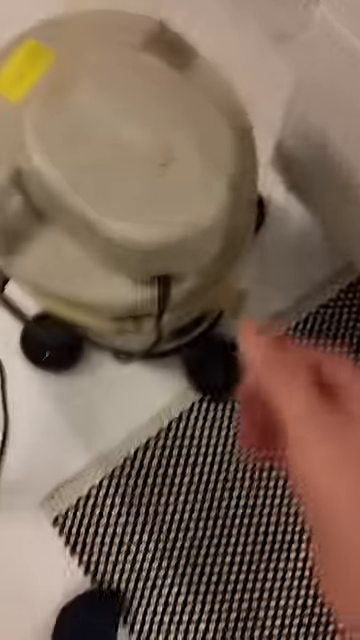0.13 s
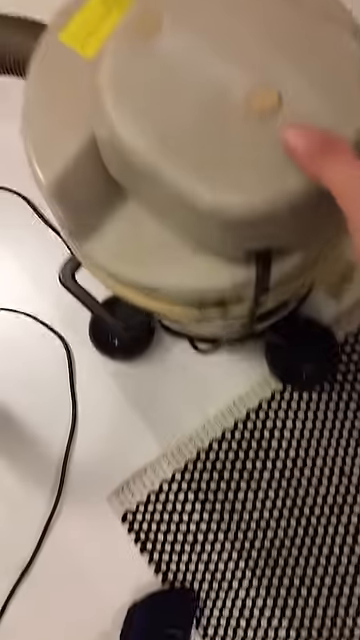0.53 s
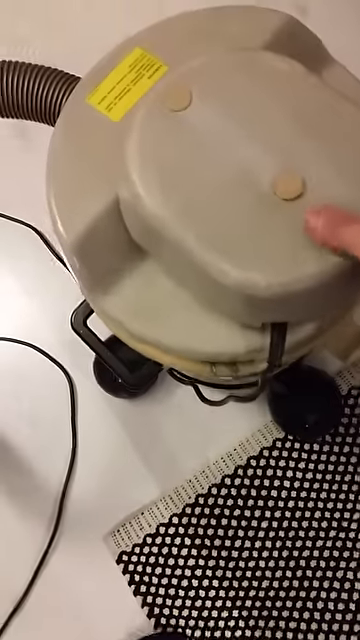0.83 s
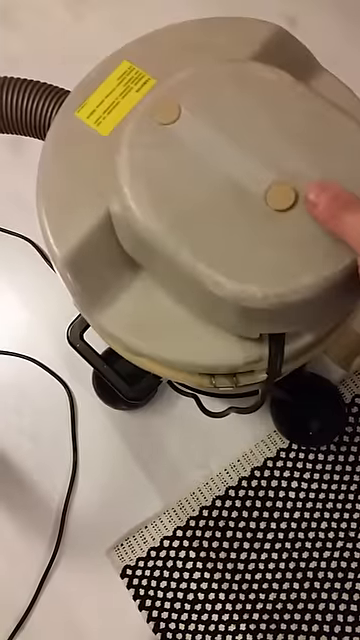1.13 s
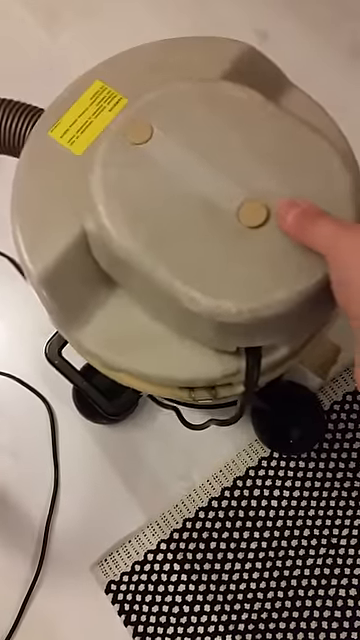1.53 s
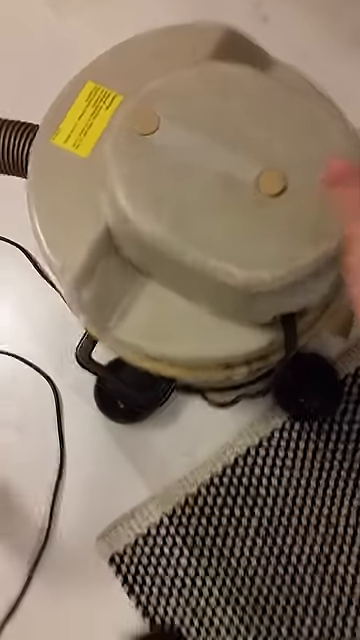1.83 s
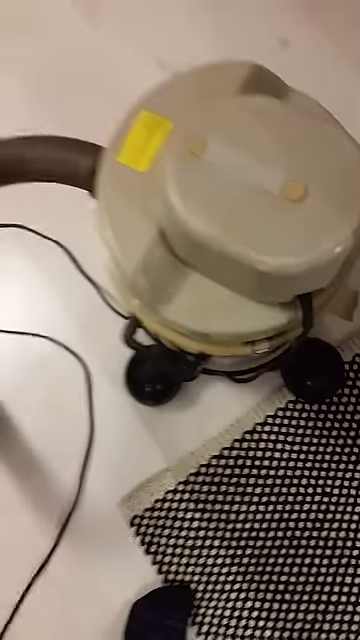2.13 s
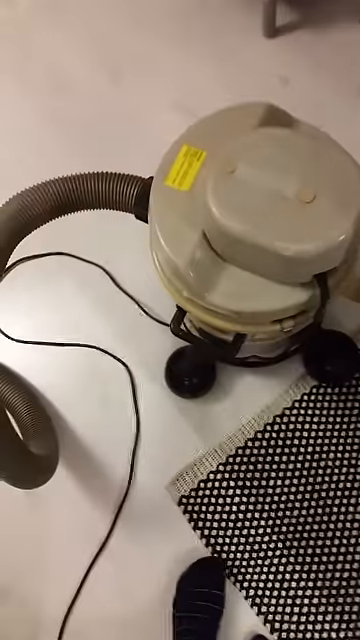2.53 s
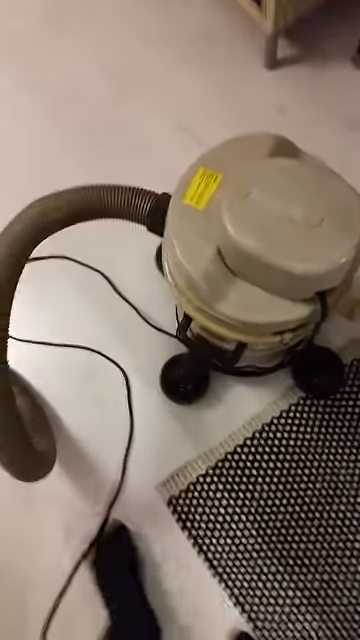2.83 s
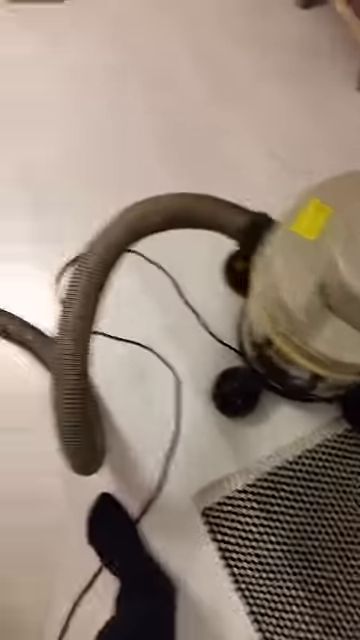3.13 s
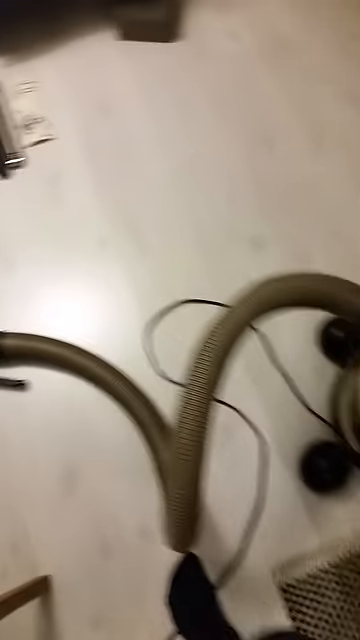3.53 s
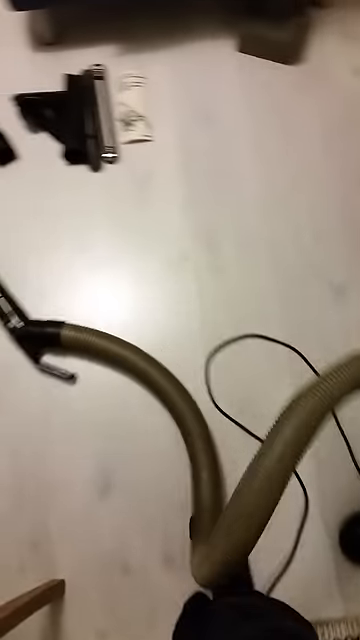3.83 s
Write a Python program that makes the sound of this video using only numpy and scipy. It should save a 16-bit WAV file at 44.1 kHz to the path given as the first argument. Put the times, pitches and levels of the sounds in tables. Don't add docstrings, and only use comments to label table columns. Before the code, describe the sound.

A canister vacuum cleaner is switched on: quiet room with rustle and small knocks, a hard plastic snap, a hum and rapidly rising whine, then a steady airy roar, picked up close by a handheld phone.

```python
import sys
import numpy as np
from scipy import signal
from scipy.fft import rfft, irfft
from scipy.io import wavfile
from scipy.ndimage import uniform_filter1d

SR = 44100
rng = np.random.default_rng(int(sys.argv[2]) if len(sys.argv) > 2 else 0)


def generate_wav(signal):
    frames = np.transpose(np.atleast_2d(signal))
    scaled = np.clip(frames, -1, 1) * 32767
    pcm = np.round(scaled).astype(np.int16)
    wavfile.write(sys.argv[1], SR, pcm)


def magnitude_from_level(level_db):
    exponent = np.asarray(level_db, float) / 20
    return 10 ** exponent


N = 176400
TIME_S = np.arange(N) / SR

# (frequency [Hz], level [dB])
ROOM_LEFT = [(20, -93), (45, -76.5), (130, -94), (600, -93.5), (1800, -104), (2700, -124), (7500, -134),
             (15500, -120)]
ROOM_RIGHT = [(20, -75.5), (90, -71), (150, -77.5), (260, -92), (1800, -109), (2800, -121), (8000, -134),
              (15500, -122)]
# (time [s], level [dB], pitch [Hz], t60 [s], left-right [dB])
KNOCKS = [
    (.125, -51, 150, .06, -8),
    (.19, -51, 140, .06, -8),
    (.368, -58, 450, .05, 4),
    (.479, -57, 300, .05, -4),
    (.811, -62, 540, .04, 6),
    (.845, -62, 1000, .06, 3),
    (.846, -58, 565, .07, 3),
    (.902, -55, 406, .09, 4),
    (.932, -61, 900, .05, 4),
    (1.482, -37, 95, .06, -8),
]
# (delay [s], level [dB], extra level of bright modes [dB])
BOUNCES = [
    (-.0008, -11, -33),
    (.0006, -3, -1),
    (.0014, -14, 1),
    (.002, -6.5, 9.5),
    (.0032, 2, -6),
    (.0052, -8, -3),
    (.0072, -14, 0),
    (.041, -6, -20),
    (.044, -11, -20),
]
# (frequency [Hz], level [dB], t60 [s])
LID_MODES = [(695, 1.5, 0.021), (1270, -8, 0.011), (1680, -2.5, 0.017), (1990, -12, 0.025),
             (4670, -10, 0.008), (7500, -27, 0.005), (11600, -5, .004), (13700, 1, .004), (15300, -8, .004),
             (16600, -14, .003)]
# (multiple of hum [1], level [dB])
HUM_OVERTONES = [(2, -19), (3, -23.5), (4, -14), (5, -15.5)]
# (time [s], air rush [dB], shaft tone [dB], shaft left-right [dB],
# sixth-order whine [dB], dulling share [1])
PHONE_PATH = [(1.7, -21.5, -59, 2, -58, -3), (1.79, -22.5, -25.5, 1.5, -51, -1.1),
              (1.85, -18, -22, 1.5, -46, -1.5), (1.89, -19.5, -28.5, 2, -36, -0.8),
              (1.95, -19, -40.5, 17, -37, -0.7), (2.03, -20.5, -38, 9, -42.5, -0.9),
              (2.08, -19, -24.5, -5, -27, -1.5), (2.251, -20.5, -24.5, -6.5, -42, -0.85),
              (2.45, -20.5, -15.5, -3, -46, -1.2), (2.57, -20, -32, -14.5, -41, -1.3),
              (2.7, -20, -22.5, 0.5, -58, -0.94), (2.9, -20, -19.5, -2.5, -43, -1.35),
              (3.18, -20, -16.5, -2, -29, -2.0), (3.36, -21.5, -14.5, -0.5, -43, -1.7),
              (3.48, -20.5, -13.5, -1.5, -28.5, -2.5), (3.7, -19.5, -14.5, -4.5, -35, -3),
              (3.9, -19, -16, -4, -30, -3.5), (4.0, -19.5, -17.5, -5.5, -30.5, -3.5)]
AIR_COL, SHAFT_COL, PAN_COL, WHINE_COL, DULL_COL = range(1, 6)
# (time [s], lag [s])
RIGHT_LAG = [
    (1.7, .00006),
    (2.0, .0002),
    (2.6, .00019),
    (3.1, .00013),
    (3.5, .00005),
    (3.8, -.00001),
]
# (multiple of shaft rate [1], level [dB], extra level at standstill [dB])
SHAFT_ORDERS = [(3, -42, -25), (4, -45, -12), (5, -45, -8), (24, -55, -25), (26, -55, -25)]
# (time [s], frequency [Hz], width [Hz], level [dB], span [s])
SQUEALS = [
    (2.095, 10230, 150, -29, .032),
    (2.165, 10760, 200, -30, .022),
    (2.23, 10230, 200, -35, .07),
    (1.95, 9000, 300, -37, .03),
]
# (frequency [Hz], level [dB per Hz])
AIR = [(40, -13), (110, -13), (170, -1), (400, 0), (1400, -1.5), (3000, -6), (6000, -7.5), (16000, -22)]
# (frequency [Hz], power of speed [1])
AIR_GROWTH = [(100, 0.34), (800, 1.35), (3000, 3.45), (5200, 2.4), (7000, 3.7), (10000, 2.35), (15000, 1.5)]
# (frequency [Hz], width [Hz], boost [dB])
DRUM_MODES = [(381.5, 28, 6.5), (674, 110, -6.5), (863, 34, 4), (1430, 140, -4), (2000, 790, 6),
              (2830, 48, 6.5), (3220, 690, -2.5), (3860, 35, 3), (5340, 67, 0), (10500, 100, 1),
              (9200, 720, 2), (10150, 500, 1.5)]
# (frequency [Hz], width [Hz], boost [dB])
FLOOR_BOUNCE = [(820, 190, 4), (1680, 1150, -3.5), (380, 190, 4)]
# (left [dB], right [dB])
TURN_DB = (4.5, 1)
# (frequency [Hz], correlation [1])
AIR_LIKENESS = [(60, .7), (130, .95), (290, .85), (640, .65), (950, .65), (1410, .36), (3100, .22),
                (5500, .12)]
# (time [s], level [dB], length [s])
BOOMS = [
    (1.96, -37, 0.061),
    (2.117, -35.5, 0.15),
    (2.286, -40, 0.037),
    (2.6, -27.5, 0.051),
    (2.793, -28, 0.046),
    (3.034, -25, 0.037),
    (3.17, -29, 0.034),
    (3.371, -29, 0.058),
    (3.643, -29.5, 0.056),
    (3.847, -32.5, 0.057),
]
# (frequency [Hz], gain [dB])
MIC_LEFT = [(45, -2.5), (700, 3), (2400, 2.5), (4200, 5.5), (5200, -3.5), (7200, 1.5), (9600, 9.5),
            (15500, 0)]
MIC_RIGHT = [(60, 1), (700, -1), (2400, 4.5), (4000, 6), (5500, 9), (7500, -8), (11000, -42), (15500, -3)]

ROOM_DB, HISS_HZ, HISS_WIDTH_HZ, HISS_DB = 1.5, 3870, 320, (-99, -111)
RUSTLE_END_S, RUSTLE_DB = .47, 4.2
RUSTLE_HZ, RUSTLE_WIDTH_HZ, RUSTLE_PEAK_DB = 1690, 160, 9
SHAKE_DB, SHAKE_HZ = -2, 75
MAINS_HZ, MAINS_DB = 49, -69
SWITCH_S, CLICK_DB, BRIGHT_HZ = 1.692, -29, 3000
HUM_HZ = 100
HUM_START_DB, HUM_RUN_DB, HUM_RISE_S, HUM_FALL_S = -29.5, -47, .025, .4
TOP_HZ, SPIN_S, SPIN_SHAPE = 333.3, .18, .85
WAVER_DB, WOBBLE = .9, .0004
RATTLE_DB = 2.5
OCTAVE_DB = -27
BLADE_ORDER, BLADE_DB, BLADE_START_DB, BLADE_THROB = 12, -54, 18, .8
DUCT_HZ, DUCT_WIDTH_HZ = 2050, 900
SPARK_DB, SPARK_TILT_DB_PER_OCTAVE = -20, -1.5
SPARK_TOP_HZ, SPARK_TOP_DB = 13500, 7
BLADE_AIR_DB, BLADE_AIR_WIDTH_HZ = 13, 550
DULL_HZ, DULL_WIDTH_HZ = 5570, 5550
PATCHY_DB, FLICKER_DB, SWELL_DB, RIDGE_DB = .9, .4, .2, .8
BOOM_HZ = 189.9
GATE_HZ, GATE_SHARE = 7600, .1
LIMIT, EDGE_HZ, SNAP_S = 1.1, 15760, .0025


def read(points, hz):
    f, value = np.transpose(points)
    return np.interp(np.log(hz + 1), np.log(f + 1), value)


def evened(x):
    return x / np.sqrt(np.mean(x ** 2) + 1e-20)


def drift(t, rate_hz):
    rates_hz = np.geomspace(rate_hz / 20, rate_hz, 20)
    return evened(sum(np.sin(2 * np.pi * (f * t + rng.random())) / np.sqrt(f) for f in rates_hz))


def bump(hz, centre_hz, width_hz):
    return 1 / (1 + (2 * (hz - centre_hz) / width_hz) ** 2)


def patches(hz, t, size):
    field = rng.standard_normal((len(t), len(hz))).T
    field = uniform_filter1d(field, size[0], axis=0)
    return evened(uniform_filter1d(field, size[1], axis=1))


def speed(t):
    return 1 - np.exp(-(np.maximum(t - SWITCH_S, 0) / SPIN_S) ** SPIN_SHAPE)


def phone_path(t, column):
    rows = np.array(PHONE_PATH)
    return np.interp(t, rows[:, 0], rows[:, column])


def lag_s(t):
    return np.interp(t, *np.transpose(RIGHT_LAG))


def noise(gain, likeness, size):
    hop, hz = size // 4, np.fft.rfftfreq(size, 1 / SR)[:, None]
    frames = N // hop + 5
    t = np.arange(frames) * hop / SR
    a, b, c, d = rng.standard_normal((frames, size // 2 + 1, 4)).T
    same = np.clip(read(likeness, hz), -1, 1)
    left, other = a + 1j * b, c + 1j * d
    right = same * left + np.sqrt(1 - same ** 2) * other
    right = right * np.exp(-2j * np.pi * hz * lag_s(t))
    z = np.array([left, right]) * gain(hz, t)
    return signal.istft(z, nperseg=size, noverlap=size - hop)[1][:, :N] / np.sqrt(size)


def room():
    def gain(hz, t):
        base = magnitude_from_level(np.array([read(ROOM_LEFT, hz), read(ROOM_RIGHT, hz)]))
        hiss_db = np.array(HISS_DB)[:, None, None]
        hiss = magnitude_from_level(hiss_db) * np.exp(-.5 * ((hz - HISS_HZ) / HISS_WIDTH_HZ) ** 2)
        hiss = hiss + magnitude_from_level(hiss_db - 17) * np.exp(-.5 * ((hz - 5000) / 450) ** 2)
        moving = 1 / (1 + np.exp((t - RUSTLE_END_S) / .04))
        level_db = moving * (RUSTLE_DB + RUSTLE_PEAK_DB * bump(hz, RUSTLE_HZ, RUSTLE_WIDTH_HZ))
        level_db = level_db + SHAKE_DB * speed(t) * (hz < SHAKE_HZ)
        return (base + hiss) * magnitude_from_level(level_db + .7 * drift(t, 12))
    return magnitude_from_level(ROOM_DB + 47) * noise(gain, [(50, .35), (200, .15), (3000, .05)], size=1024)


def house_mains():
    return np.sqrt(2) * magnitude_from_level(MAINS_DB) * np.sin(2 * np.pi * MAINS_HZ * TIME_S)


def knocks():
    out, t = np.zeros((2, N)), np.arange(5000) / SR
    for s, db, hz, t60, pan_db in KNOCKS:
        ring = np.sin(2 * np.pi * hz * t) + .5 * np.sin(2 * np.pi * 1.55 * hz * t)
        puff = magnitude_from_level(db - 60 * t / t60) * np.minimum(t / .003, 1) * ring
        at = round(s * SR)
        out[:, at:at + len(t)] += np.outer(magnitude_from_level(np.array([pan_db, -pan_db]) / 2), puff)
    return out


def switch():
    out, t = np.zeros(N), np.arange(3000) / SR
    attack = np.minimum(t / .00025, 1)
    for delay, bounce_db, bright_db in BOUNCES:
        at = round((SWITCH_S + delay) * SR)
        for hz, db, t60 in LID_MODES:
            level_db = CLICK_DB + bounce_db + db + bright_db * (hz > BRIGHT_HZ)
            ring = np.sin(2 * np.pi * hz * rng.uniform(0.92, 1.08) * t) * rng.choice([-1, 1])
            out[at:at + len(t)] += magnitude_from_level(level_db - 60 * t / t60) * ring * attack
    return out


def motor_hum():
    since = np.maximum(TIME_S - SWITCH_S, 0)
    level_db = HUM_RUN_DB + (HUM_START_DB - HUM_RUN_DB) * np.exp(-(since / HUM_FALL_S) ** 2)
    level_db += (.7 + 2 * speed(TIME_S) ** 2) * drift(TIME_S, 20)
    partials = [(0.98, 0.0039)] + HUM_OVERTONES
    hum = sum(magnitude_from_level(db) * np.sin(2 * np.pi * (k * HUM_HZ * since + rng.random())) for k, db in partials)
    return hum * np.sqrt(2) * magnitude_from_level(level_db) * np.minimum(since / HUM_RISE_S, 1)


def order(turn, k, db):
    waver_db = WAVER_DB * (1 - np.log(k) / 6) + RATTLE_DB * (1 - speed(TIME_S))
    level = np.sqrt(2) * magnitude_from_level(db + waver_db * drift(TIME_S, 25))
    return level * np.sin(k * turn + 2 * np.pi * rng.random())


def whine(turn, hz):
    slow = 1 - speed(TIME_S)
    out = order(turn, 6, phone_path(TIME_S, WHINE_COL))
    out = out + order(turn, 2, phone_path(TIME_S, SHAFT_COL) + OCTAVE_DB)
    for k, db, extra_db in SHAFT_ORDERS:
        out = out + order(turn, round(k), db + extra_db * slow)
    throb = 1 + BLADE_THROB * np.cos(2 * np.pi * HUM_HZ * np.maximum(TIME_S - SWITCH_S, 0))
    blade_db = BLADE_DB + BLADE_START_DB * bump(BLADE_ORDER * hz, DUCT_HZ, DUCT_WIDTH_HZ)
    return out + throb * order(turn, BLADE_ORDER, blade_db)


def squeals(turn, hz):
    out = np.zeros((2, N))
    span = slice(round(SWITCH_S * SR), round(2.5 * SR))
    for s, f, width_hz, db, length in SQUEALS:
        moment = magnitude_from_level(db) * bump(TIME_S[span], s, 2 * length) ** 2
        for k in range(31, 42):
            tone = np.sin(k * turn[:, span]) * bump(k * hz[span], f, width_hz)
            out[:, span] += np.sqrt(2) * moment * tone
    return out


def motor():
    since = np.maximum(TIME_S - SWITCH_S, 0)
    hz = TOP_HZ * speed(TIME_S) * (1 + WOBBLE * drift(TIME_S, 7.85))
    turn = 2 * np.pi * (np.cumsum(hz) / SR - np.outer([0, 1], hz * lag_s(TIME_S)))
    pan_db = np.outer([.5, -.5], phone_path(TIME_S, PAN_COL))
    shaft = order(turn, 1, phone_path(TIME_S, SHAFT_COL)) * magnitude_from_level(pan_db) * np.minimum(since / 0.11, 1)
    high = (whine(turn, hz) + squeals(turn, hz)) * np.minimum(since / .09, 1) ** 2
    return motor_hum() + shaft + high


def rush():
    def gain(hz, t):
        share = speed(t)
        fizz_db = SPARK_DB + SPARK_TILT_DB_PER_OCTAVE * np.log2(1 + hz / 1000)
        fizz_db = fizz_db + SPARK_TOP_DB * bump(hz, SPARK_TOP_HZ, 4000)
        grown = np.sqrt(share ** (2 * read(AIR_GROWTH, hz)) + magnitude_from_level(fizz_db) ** 2)

        dull_band = bump(hz, DULL_HZ, DULL_WIDTH_HZ)
        colour_db = read(AIR, hz) + 3.38 * phone_path(t, DULL_COL) * dull_band
        blade_band = bump(hz, BLADE_ORDER * TOP_HZ * share, BLADE_AIR_WIDTH_HZ)
        colour_db += BLADE_AIR_DB * (1 - share) * blade_band

        chance_db = PATCHY_DB * patches(hz, t, size=(12, 10))
        chance_db = chance_db + RIDGE_DB * patches(hz, t, size=(4, 50))
        chance_db = chance_db + SWELL_DB * drift(t, 3.84) + FLICKER_DB * drift(t, 40)

        away_s, away_lag_s = RIGHT_LAG[1]
        turned = np.clip(1 - lag_s(np.maximum(t, away_s)) / away_lag_s, 0, 1)
        turn_db = np.array(TURN_DB)[:, None, None] * turned * dull_band ** 2
        turn_db = turn_db + np.sqrt(turned) * sum(db * bump(hz, f, w) for f, w, db in FLOOR_BOUNCE)
        return grown * magnitude_from_level(colour_db + chance_db + turn_db)
    hz = np.fft.rfftfreq(N, 1 / SR)
    ring = 1 + sum((magnitude_from_level(db) - 1) * bump(hz, f, w) for f, w, db in DRUM_MODES)
    air = irfft(rfft(noise(gain, AIR_LIKENESS, size=1024)) * ring, N)
    start = np.clip((TIME_S - SWITCH_S) / 0.0023, 0, 1)
    return magnitude_from_level(phone_path(TIME_S, AIR_COL)) * evened(air) * np.sqrt(.5) * start


def booms():
    swell = sum(magnitude_from_level(db) * np.exp(-.5 * ((TIME_S - s) / length) ** 2) for s, db, length in BOOMS)
    hz = BOOM_HZ * speed(TIME_S) ** .6 * (1 + 0.015 * drift(TIME_S, 11))
    return np.sqrt(2) * swell * np.sin(2 * np.pi * np.cumsum(hz) / SR)


def miked(x):
    hz = np.fft.rfftfreq(2 * N, 1 / SR)
    response = magnitude_from_level(np.array([read(MIC_LEFT, hz), read(MIC_RIGHT, hz)]))
    return irfft(rfft(x, 2 * N) * response, 2 * N)[:, :N]


def scene():
    machine = switch() + motor() + rush() + booms()
    return room() + house_mains() + knocks() + miked(machine)


def roll_off(x):
    return signal.sosfilt(signal.butter(12, 16540, fs=SR, output="sos"), x)


def record(dry):
    hz, t, z = signal.stft(dry, SR, nperseg=2048)
    field = patches(hz, t, size=(9, 3))
    shut = (field < np.quantile(field, GATE_SHARE)) & (hz[:, None] > GATE_HZ) & (t > SWITCH_S)
    gate = np.array([np.ones(shut.shape), 1 - shut])
    gated = signal.istft(z * gate, SR, nperseg=2048)[1][:, :N]
    soft = LIMIT * np.tanh(gated / LIMIT)
    lowpass = signal.firwin(2047, EDGE_HZ, window=("kaiser", 9), fs=SR)
    mix = signal.oaconvolve(soft, lowpass[None], "same")
    mix += (soft - mix) * np.exp(-((TIME_S - SWITCH_S - SNAP_S / 2) / SNAP_S) ** 2)
    return roll_off(mix)


dry = scene()
out = record(dry)
generate_wav(out)
```